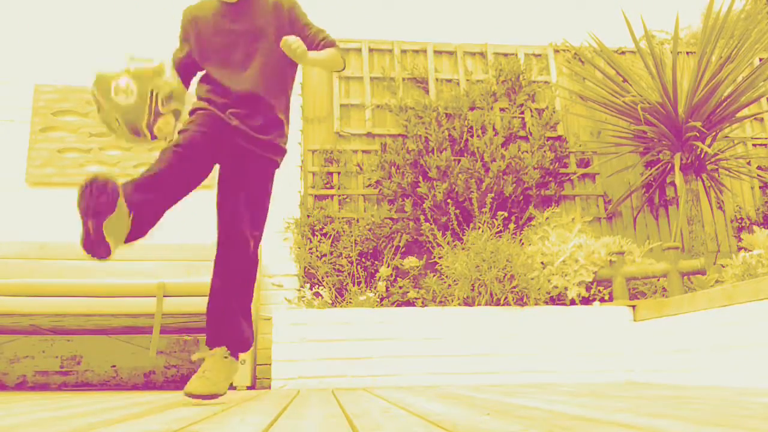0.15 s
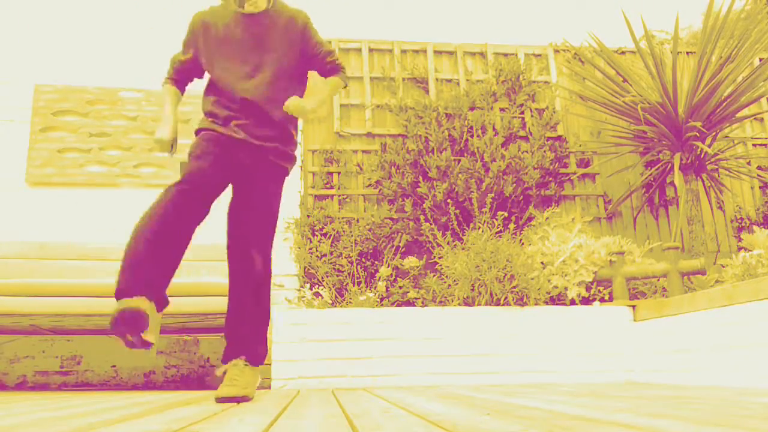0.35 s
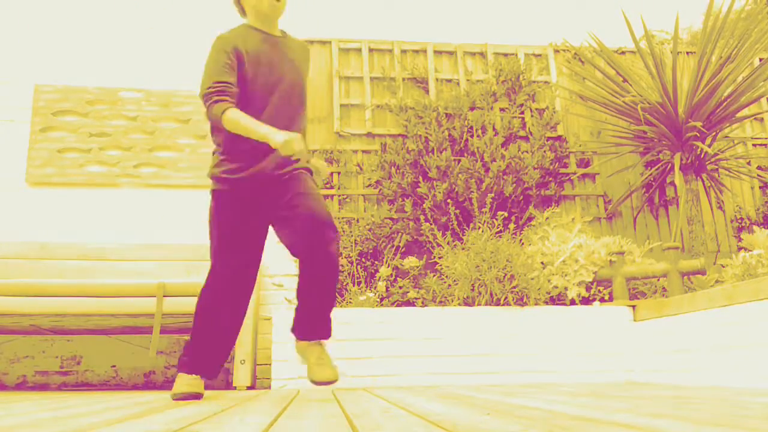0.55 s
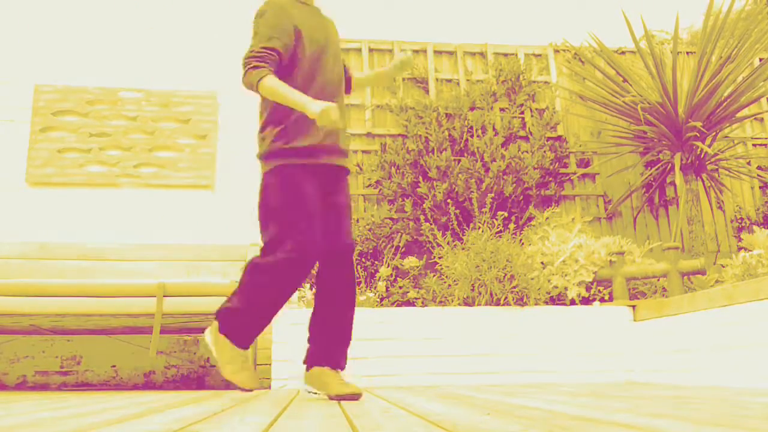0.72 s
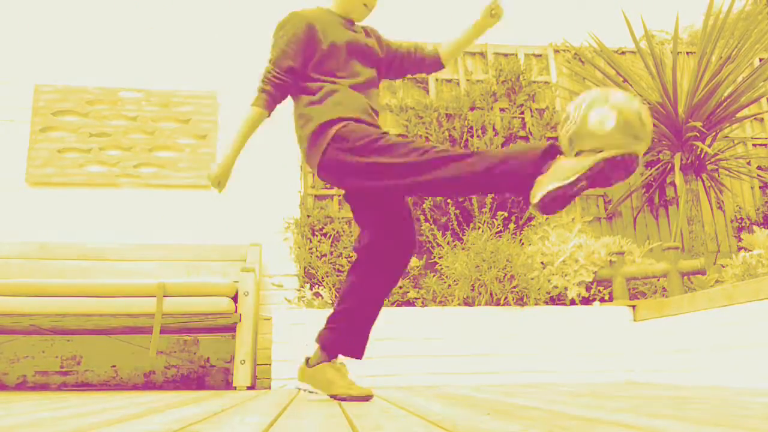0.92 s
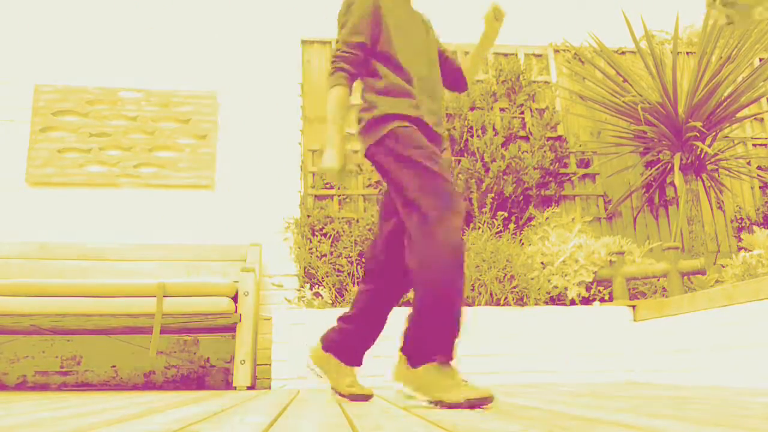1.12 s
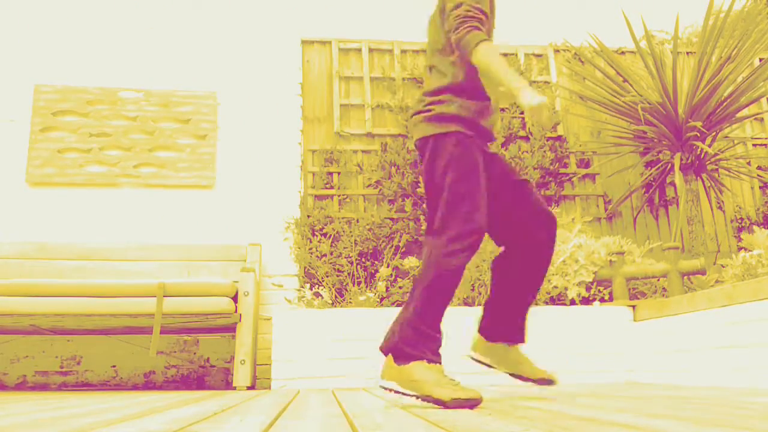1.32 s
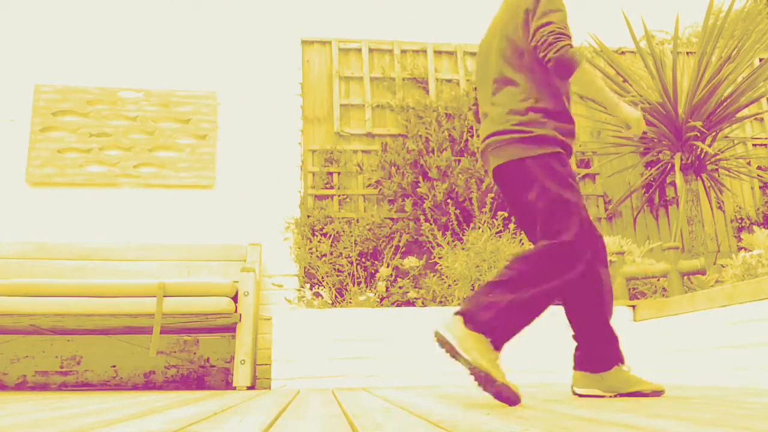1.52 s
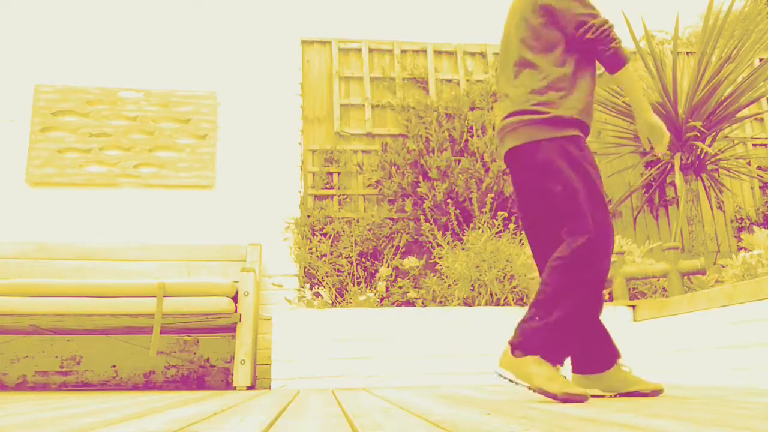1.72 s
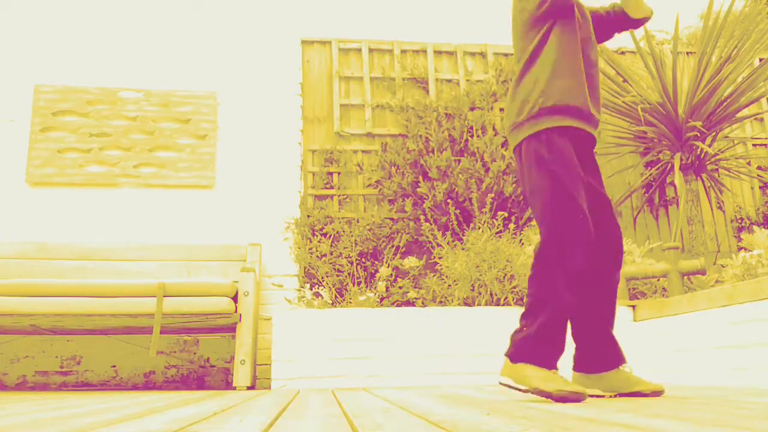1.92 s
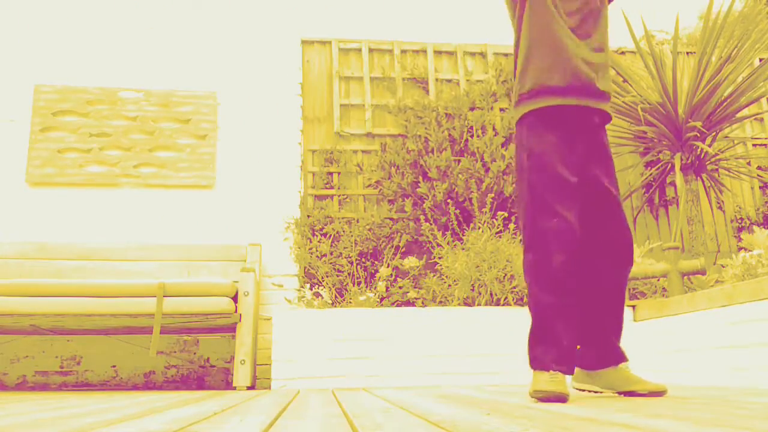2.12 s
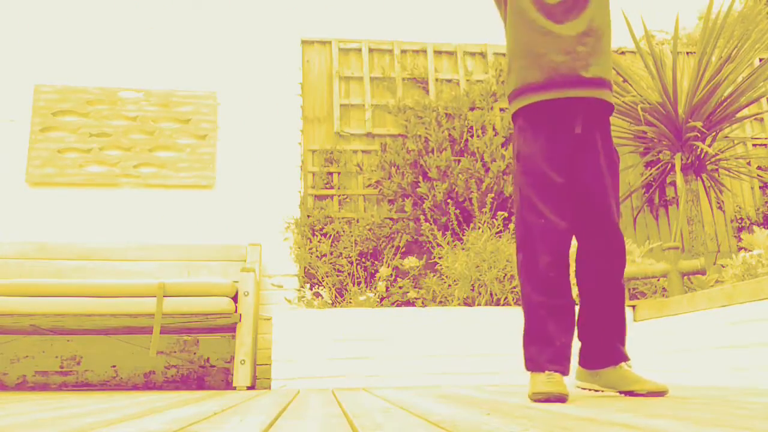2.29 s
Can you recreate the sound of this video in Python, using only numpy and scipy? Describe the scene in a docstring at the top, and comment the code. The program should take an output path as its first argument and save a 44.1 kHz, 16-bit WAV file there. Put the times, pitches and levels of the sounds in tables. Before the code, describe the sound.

A football is juggled on a wooden deck: dull thigh bump, shuffling steps, then a sharp kick

```python
"""A football is juggled on a wooden garden deck, over a faint outdoor rumble and soft swishes of trousers.
First comes a dull bump off the thigh: the ball squashes, and its shell booms.
Trainers then knock and scuff on the boards, and the player's weight thumps the joists under them.
A sharp kick follows: the cover slaps and the air inside the ball rings on.
More steps, scuffs and thumps come after it; garden walls briefly answer ball and feet throughout."""
import sys
import numpy as np
from scipy import signal
from scipy.fft import rfft, irfft
from scipy.io import wavfile

SR = 44100
rng = np.random.default_rng(int(sys.argv[2]) if len(sys.argv) > 2 else 0)


def dump_mix(stems):
    """Bounce the given channels to the path in sys.argv[1] as a 16-bit WAV at rate SR."""
    frames = np.atleast_2d(stems).T  # one column per channel
    limited = np.clip(frames, -1, 1)  # hard clip at full scale
    pcm = np.round(limited * 32767).astype(np.int16)
    wavfile.write(sys.argv[1], SR, pcm)


N = 103635  # length of the scene in samples
T = np.arange(SR * 3 // 5) / SR  # clock of one single sound, 0.6 s long


def amp(db):
    """Turn decibels into a gain."""
    return 10 ** (np.asarray(db) / 20)


def unit(x):
    """Scale a sound to an average strength (rms) of 1."""
    return x / np.sqrt(np.mean(x ** 2) + 1e-20)


def along(points, hz):
    """Read a curve of (f/Hz, value) points between its points, on a log frequency axis."""
    f, value = np.transpose(points)
    return np.interp(np.log(hz + 1), np.log(f + 1), value)


def fade(t60):
    """Die away exponentially, falling by 60 dB in t60 seconds."""
    return np.exp(-np.log(1000) * T / t60)


def add(track, start_s, sound):
    """Mix a sound into the track from a given time, cutting it at the track's end."""
    part = track[round(start_s * SR):][:len(sound)]
    part += sound[:len(part)]


def shaped_noise(gain, size):
    """Give every frequency its gain and a random phase: noise of rms 1."""
    phase = 2 * np.pi * rng.random(len(gain))
    return unit(irfft(gain * np.exp(1j * phase), size))


def noise(spectrum, size, cut_hz=SR, tilt=0):
    """Coloured noise of rms 1, softly low-passed, tilted above 2 kHz by some dB per octave."""
    f = np.fft.rfftfreq(size, 1 / SR)
    octaves_up = np.log2(np.maximum(f / 2000, 1))
    low_pass = 1 / np.sqrt(1 + (f / cut_hz) ** 4)
    return shaped_noise(amp(along(spectrum, f) + tilt * octaves_up) * low_pass, size)


def dying(x, t60s):
    """Let each frequency of a sound die away at its own speed."""
    hz, t, z = signal.stft(x, SR, nperseg=256)
    decay = np.exp(-np.log(1000) * t / along(t60s, hz)[:, None])
    return signal.istft(z * decay, SR, nperseg=256)[1][:len(x)]


def ring(modes, attack_s, pitch=1, alternate=False):
    """Sum fading sine tones (modes); each level varies a little at random from strike to strike."""
    total = np.zeros(len(T))
    for k, (hz, db, t60) in enumerate(modes):
        strength = amp(db + rng.normal(0, 1))
        wave = strength * fade(t60) * np.sin(2 * np.pi * hz * pitch * T)
        total += -wave if alternate and k % 2 else wave  # alternate: flip every second mode
    return (1 - np.exp(-T / attack_s)) * total


def grit(depth_db):
    """A fast random gain of rms 1, as surfaces catch and let go 700 times a second."""
    swings = np.interp(T * 700, np.arange(len(T)), rng.standard_normal(len(T)))
    return unit(amp(depth_db * swings))


# touches of the ball: t/s, delay of the shell boom t/s, squash level/dB, shell boom level/dB,
# cover slap level/dB, slap cut-off f/Hz, inner ring level/dB, thwack level/dB
BALL_TOUCHES = [(0.1996, 0.0044, -13, -14.5, -27.5, 1986, -61.5, -43),
                (0.9287, .0155, -15, -17.5, -15, 11900, -34.5, -10.5)]
# tones of the ball's shell: f/Hz, level within the boom/dB, time to fall 60 dB t/s
SHELL_MODES = [(104.6, 2, 0.17), (124.2, -13, 0.44), (152.2, -11.5, 0.31), (207, -17, 0.26),
               (337, -24.5, 0.2), (528, -31.5, 0.44)]
# groups of tones in the air inside the ball: f/Hz, width f/Hz, level within the ring/dB
INNER_AIR = [(547, 51, -5.5), (617, 50, -3), (664, 56, -6), (1088, 110, -21), (1584, 86, -12.5),
             (1810, 110, -8), (2400, 200, -18), (2830, 150, -15), (3480, 170, -15), (4000, 220, -19)]
# how fast the inner ring dies: f/Hz, time to fall 60 dB t/s
INNER_AIR_T60 = [(600, 0.53), (1800, 0.54), (4000, 0.46)]
# colour of the cover slap: f/Hz, relative level/dB
SLAP_COLOUR = [(150, -8.5), (500, -1), (1300, -9), (2500, -14), (4500, -18.5), (8000, -18), (12000, -15.5),
               (15500, -23.5)]
# thwack tones of the cover: f/Hz, level within the thwack/dB, time to fall 60 dB t/s
THWACK_MODES = [(577.4, -1, 0.075), (713, -0.5, .032), (1080, -5.5, .035), (1643, -12, 0.055)]
SQUASH_HZ, SQUASH_WIDTH_S, SQUASH_DELAY_S = 110, 0.0034, 0.0027
# three parts of the slap: a quick crack, a main body at 0 dB and a rough tail
CRACK_DB, CRACK_T60_S = -6, 0.0058
SLAP_T60_S = 0.016
SLAP_TAIL_DB, SLAP_TAIL_T60_S, SLAP_ROUGH_DB = -8.5, 0.15, 2


def ball():
    """The cover slaps, the ball squashes and springs back, then shell and inner air ring on."""
    out = np.zeros(N)
    f = np.fft.rfftfreq(len(T), 1 / SR)
    cavity = sum(amp(db) / (1 + ((f - hz) / (width / 2)) ** 2) for hz, width, db in INNER_AIR)
    for s, delay_s, squash_db, boom_db, slap_db, cut_hz, ring_db, thwack_db in BALL_TOUCHES:
        # the squash is one short, smooth burst of a low tone
        u = T - delay_s
        swell = np.exp(-((u - SQUASH_DELAY_S) / SQUASH_WIDTH_S) ** 2 / 2)
        add(out, s, amp(squash_db) * np.sin(2 * np.pi * SQUASH_HZ * u) * swell)
        add(out, s + delay_s, amp(boom_db) * ring(SHELL_MODES, attack_s=0.00068))

        crack = amp(CRACK_DB) * fade(CRACK_T60_S)
        tail = amp(SLAP_TAIL_DB) * fade(SLAP_TAIL_T60_S) * grit(SLAP_ROUGH_DB)
        slap_shape = crack + fade(SLAP_T60_S) + tail
        add(out, s, amp(slap_db) * noise(SLAP_COLOUR, len(T), cut_hz) * slap_shape)

        inner = shaped_noise(cavity, len(T))
        add(out, s, amp(ring_db) * dying(inner, INNER_AIR_T60))
        add(out, s, amp(thwack_db) * ring(THWACK_MODES, attack_s=0.00062, alternate=True))
    return out


# shoes striking the deck: t/s, knock level/dB, knock f/Hz, board clatter level/dB,
# clatter cut-off f/Hz, plank ring level/dB, plank f/Hz, hard sole clack level/dB
SHOE_STEPS = [(0.246, -47, 560, -41.5, 700, -31, 352, -70), (.289, -42.5, 645, -51, 1100, -62, 350, -60),
              (.465, -34.5, 1090, -35, 3000, -35, 324, -33), (0.5279, -21, 654, -30.5, 900, -34, 367, -53),
              (.6535, -28, 627, -26.5, 990, -38, 332, -35), (.895, -25.5, 665, -29, 1390, -47, 313, -32),
              (.912, -31, 536, -28.5, 1530, -36.5, 254, -41),
              (0.939, -19.5, 1410, -26, 1740, -26, 234, -19.5),
              (1.1483, -13.5, 924, -20.5, 2550, -25.5, 351.2, -11.5),
              (1.427, -27.5, 800, -30.5, 1170, -39.5, 272, -51),
              (1.447, -17, 766, -27.5, 2700, -24, 292.4, -48),
              (1.4829, -50, 650, -43.5, 900, -24, 294, -58),
              (1.550, -43.5, 805, -42.5, 1500, -46, 290, -62),
              (1.571, -33, 673, -42.5, 1120, -46, 284, -42), (1.667, -27.5, 580, -39, 1510, -47, 293, -40)]
# tones of the knock: multiple of the knock pitch, relative level/dB, time to fall 60 dB t/s
KNOCK_MODES = [(.66, -1, 0.014), (1, 1.5, 0.016), (1.37, -7.5, 0.023), (2.05, -25.5, 0.014),
               (3, -23.5, .025)]
# tones of a sole slapping flat on a board: f/Hz, relative level/dB, time to fall 60 dB t/s
CLACK_MODES = [(1216, 1, 0.043), (1837, -15, 0.064), (2530, -12.5, 0.036)]
# tones of the plank: multiple of the plank pitch, relative level/dB, time to fall 60 dB t/s
PLANK_MODES = [(1, 3, 0.13), (1.17, -12.5, 0.12), (1.9, -16, 0.077)]
# colour of the boards' clatter: f/Hz, relative level/dB
BOARD_COLOUR = [(60, -11.5), (140, -1.5), (210, -5.5), (345, 5), (440, -5), (600, -0.5), (1100, -11.5),
                (1800, -12), (3000, -19), (6000, -27), (15000, -26)]
# how fast the clatter dies: f/Hz, time to fall 60 dB t/s
CLATTER_T60 = [(100, 0.27), (350, 0.21), (1000, 0.14), (3000, 0.09), (12000, 0.061)]


def steps():
    """A shoe knocks and clacks; the plank under it rings and the boards around it clatter."""
    out = np.zeros(N)
    for s, knock_db, knock_hz, clatter_db, cut_hz, plank_db, plank_hz, clack_db in SHOE_STEPS:
        knock = ring(KNOCK_MODES, attack_s=0.00025, pitch=knock_hz, alternate=True)
        add(out, s, amp(knock_db) * knock)
        clatter = dying(noise(BOARD_COLOUR, len(T), cut_hz), CLATTER_T60)
        add(out, s, amp(clatter_db) * clatter * (1 - np.exp(-T / 0.00067)))
        add(out, s, amp(clack_db) * ring(CLACK_MODES, attack_s=0.003))
        plank = ring(PLANK_MODES, attack_s=0.0036, pitch=plank_hz, alternate=True)
        add(out, s, amp(plank_db) * plank)
    return out


# soles and ball scraping: t/s, level/dB, rise t/s, hold t/s, time to fall 60 dB t/s,
# treble tilt above 2 kHz [dB per octave]
SCRAPES = [(.203, -37, .002, .003, 0.13, -4), (0.231, -52, .012, 0.022, 0.11, 1.5),
           (0.462, -39.5, .003, 0.033, .14, -3), (0.533, -51, .003, 0.015, .18, 0.5),
           (0.656, -53.5, .008, .005, 0.13, 0), (0.69, -54, .004, .003, 0.069, -0.5),
           (0.893, -39.5, .02, 0.011, 0.16, -1), (1.144, -32, .003, 0.029, .12, -4),
           (1.427, -35.5, .016, 0.0087, 0.13, -3), (1.545, -52.5, .014, 0.0085, 0.14, 4.5),
           (1.658, -46.5, .005, .026, 0.21, -0.5)]
# colour of the scraping: f/Hz, relative level/dB
SOLE_COLOUR = [(300, -3.5), (900, 0.5), (1800, -0.5), (3200, -1.5), (5000, -13.5), (8000, -17.5),
               (12000, -21), (15500, -24.5)]
GRIT_DB = 4


def scuffs():
    """Short rubs of noise, roughened by grit, that rise, hold and die away."""
    out = np.zeros(N)
    for s, db, rise_s, hold_s, t60, tilt in SCRAPES:
        rise = np.minimum(T / rise_s, 1)
        fall = np.exp(-np.log(1000) * np.maximum(T - rise_s - hold_s, 0) / t60)
        rub = grit(GRIT_DB) * noise(SOLE_COLOUR, len(T), tilt=tilt)
        add(out, s, amp(db) * rise * fall * rub)
    return out


# weight coming down on the joists: t/s, level/dB
WEIGHT_THUMPS = [(0.33, -40), (0.523, -28), (.66, -36.5), (0.915, -22), (0.939, -19.5), (0.98, -21.5),
                 (1.032, -32), (1.084, -39.5), (1.161, -27), (1.436, -45), (1.4754, -27.5), (1.578, -26),
                 (1.673, -27), (1.733, -35.5), (1.76, -44)]
# tones of the deck's frame: f/Hz, relative level/dB, time to fall 60 dB t/s
JOIST_MODES = [(58.6, -8, 0.3), (80.7, -2.5, .17), (103.7, -6, 0.15), (130.6, -0.5, .1), (183, -3, 0.069)]


def joists():
    """The frame of the deck booms in low, fading tones under the player's weight."""
    out = np.zeros(N)
    for s, db in WEIGHT_THUMPS:
        add(out, s, amp(db) * ring(JOIST_MODES, attack_s=0.0017))
    return out


# faint swishes of trouser cloth: middle t/s, level/dB, spread to each side t/s, centre f/Hz
CLOTH_SWISHES = [(.0, -64, .04, 1590), (0.415, -62.5, .025, 1750), (0.432, -58.5, .03, 650),
                 (0.808, -64.5, .025, 1080), (1.83, -67, 0.038, 1100), (1.825, -75, 0.042, 4250),
                 (2.09, -70, .05, 1900)]
SWISH_OCTAVES = 0.58  # distance from the centre at which the gain is halved


def trousers():
    """Cloth swishes as the legs swing: soft swells of noise around one pitch."""
    out, t = np.zeros(N), np.arange(N) / SR
    f = np.fft.rfftfreq(N, 1 / SR)
    for s, db, spread_s, hz in CLOTH_SWISHES:
        band = 1 / (1 + (np.log2((f + 1) / hz) / SWISH_OCTAVES) ** 2)
        cloth = unit(irfft(band * rfft(rng.standard_normal(N)), N))
        swell = np.exp(-((t - s) / spread_s) ** 2 / 2)
        out += amp(db) * swell * cloth
    return out


# how fast the garden's answer dies: f/Hz, time to fall 60 dB t/s
WALL_T60 = [(100, 0.49), (600, 0.13), (3000, .28), (12000, 0.24)]
GARDEN_DB, GARDEN_DELAY_S = -15, 0.0058


def garden(x):
    """Walls and fence answer shortly after: the sound is smeared along a dying tail of noise."""
    tail = dying(rng.standard_normal(len(T)), WALL_T60) * (T > GARDEN_DELAY_S)
    answer = signal.fftconvolve(x, tail / np.linalg.norm(tail))[:N]
    return amp(GARDEN_DB) * answer


# colour of the outdoor rumble: f/Hz, relative level/dB
RUMBLE_COLOUR = [(25, -25.5), (50, -7), (80, -6.5), (100, -1), (130, -15.5), (250, -22), (350, -23),
                 (420, -27), (700, -26.5), (1100, -31.5), (2500, -40.5), (6000, -48), (15500, -54)]
RUMBLE_DB = -53.5


def rumble():
    """The faint outdoor rumble is steady noise, strongest in the bass."""
    return amp(RUMBLE_DB) * noise(RUMBLE_COLOUR, N)


def scene():
    """Ball and feet with the garden's answer, over cloth and the outdoor rumble."""
    play = ball() + steps() + scuffs()
    mix = play + joists() + trousers() + garden(play) + rumble()
    return mix[None]  # one channel


LOW_CUT_HZ, TOP_HZ = 42, 15300
CEILING_DB = -4


def record(dry):
    """Thin the deepest bass, round off the highest peaks and steeply cut the top treble."""
    high_pass = signal.butter(N=4, Wn=LOW_CUT_HZ, btype="high", fs=SR, output="sos")
    thinned = signal.sosfilt(high_pass, dry)
    rounded = thinned / (1 + (thinned / amp(CEILING_DB)) ** 6) ** (1 / 6)
    # 0.1 dB of ripple below the limit, 80 dB of cut beyond it
    band_limit = signal.ellip(10, 0.1, 80, TOP_HZ, fs=SR, output="sos")
    return signal.sosfilt(band_limit, rounded)


dry = scene()
out = record(dry)
dump_mix(out)
```